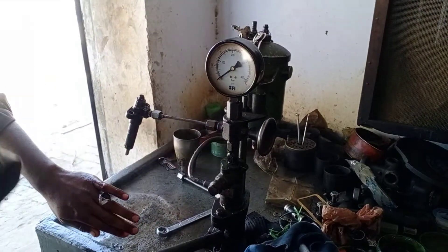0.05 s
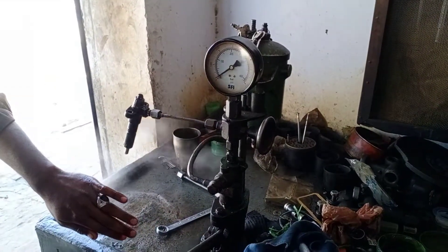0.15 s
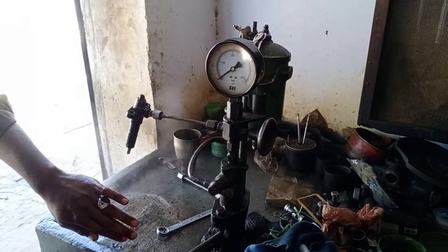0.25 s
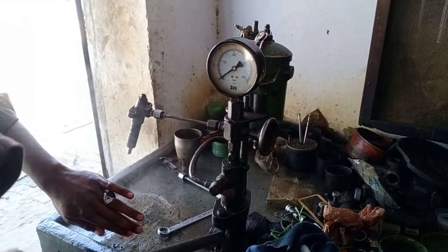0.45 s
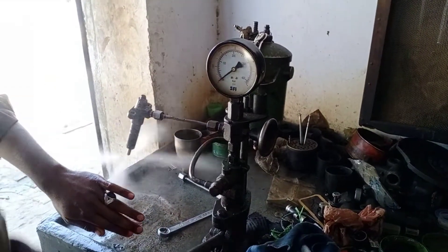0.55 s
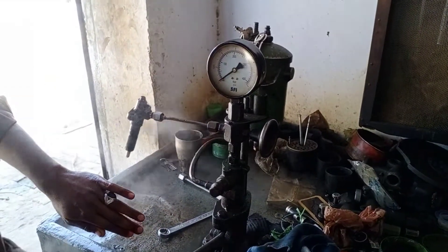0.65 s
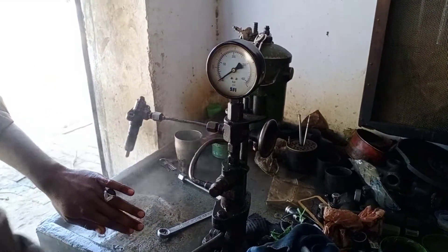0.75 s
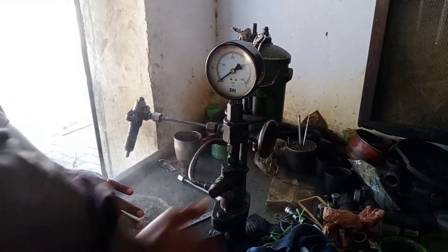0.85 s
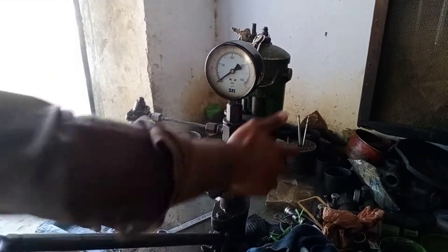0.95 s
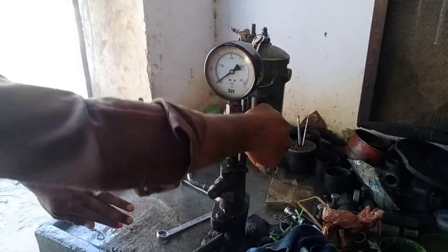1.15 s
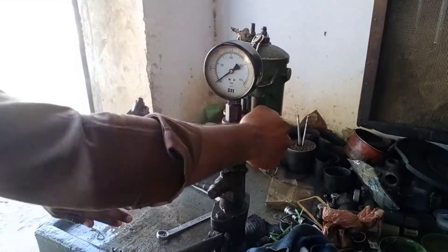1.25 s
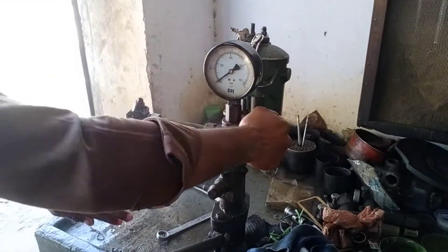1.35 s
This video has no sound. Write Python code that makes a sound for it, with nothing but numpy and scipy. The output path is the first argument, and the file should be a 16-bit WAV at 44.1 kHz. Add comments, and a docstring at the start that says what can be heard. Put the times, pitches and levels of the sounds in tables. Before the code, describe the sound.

A hand-pumped injector tester sprays twice, each short popping burst followed by a lever clack and a soft bench thud. Loose metal then knocks, clinks and clicks sharply, close to the microphone in a small, quiet workshop.

```python
"""A small workshop, one microphone at the front of the bench. A hand-pumped injector tester is worked twice.
On each stroke the nozzle needle chatters, a quick run of pops that rings the steel pipe; then the
lever clacks on its stop and the bench thuds. The hand moves on: loose metal knocks, clinks and
snaps, and a low ring hangs over the quiet room."""
import sys
import numpy as np
from scipy import signal
from scipy.fft import rfft, irfft, next_fast_len
from scipy.io import wavfile
from scipy.ndimage import uniform_filter1d, minimum_filter1d

SR = 44100
rng = np.random.default_rng(int(sys.argv[2]) if len(sys.argv) > 2 else 0)


def unload_audio(sound):
    """Save the sound as a 16-bit wav file, at the path given as the first command line argument."""
    columns = np.transpose(np.atleast_2d(sound))
    # keep every value between -1 and 1, then stretch to whole-number steps
    steps = np.round(np.clip(columns, -1, 1) * 32767)
    wavfile.write(sys.argv[1], SR, steps.astype(np.int16))


N = 61739

# spectra of the fuel pops and of their hiss: f/Hz, level/dB
POP_COLOUR = [(100, -43.5), (240, -31.5), (350, -8), (500, -7), (650, -18), (800, -16), (1000, -5),
              (1200, -8.5), (1500, 1), (1780, 1), (2000, -11), (2600, -23), (3400, -22.5), (5000, -32),
              (9000, -58), (16000, -58)]
HISS_COLOUR = [(300, -21), (2500, -11.5), (3200, 0), (3600, 7), (4100, -7), (5500, -12), (6500, -26),
               (7300, -20), (8300, -45.5), (10500, -47.5), (12500, -26.5), (16000, -35.5)]
# modes of the pipe and nozzle holder, and of the needle leaving its seat: f/Hz, level/dB, t60/s
PIPE_MODES = [(354.6, -8.5, 0.24), (498, -16, 0.37), (876.4, -16.5, 0.3), (1011, -19, 0.2),
              (1078, -12, 0.2), (1326, -12, .25), (1490, -5.5, .52), (1637, -16, 0.72), (1702, -7.5, 0.35),
              (1760, -19, 0.73), (3162, -14.5, 0.069), (3506, -15, .11)]
CRACK_MODES = [(886, -4.5, 0.095), (1007.3, -1, 0.085)]
def spray(start, swell_s, length_s, db, pops_per_s, crack_db, hiss_rise_s):
    """The needle chatters unevenly: each pop is a puff of fuel, the hiss builds, the pipe rings up."""
    pop_rise_s, pop_decay_s, jitter_s, scatter_db = 0.00095, 0.0021, 0.00076, 1
    sag_db_per_s, hiss_sag_db_per_s = 48.5, 67  # the hiss thins as the pressure falls
    puffs, t = np.zeros(N), since(start)
    for k, (late, size) in enumerate(rng.standard_normal((16, 2))):
        age = since(start + k / pops_per_s + jitter_s * late * (k > 0))
        gain = amp(scatter_db * size) * np.clip(length_s * pops_per_s - k, 0, 1)
        puffs += gain * np.exp(-age / pop_decay_s) * (1 - np.exp(-age / pop_rise_s))
    flow = puffs * ramp(start, swell_s) * amp(-sag_db_per_s * t)
    flow /= np.sqrt(np.sum(flow ** 2) / (length_s * SR))
    pops = coloured(flow * noise(), POP_COLOUR)
    hiss_flow = flow * ramp(start, hiss_rise_s) ** 2 * amp(-hiss_sag_db_per_s * t)
    hiss = coloured(hiss_flow * noise(), HISS_COLOUR)
    ring_out = since(start + 0.7 * length_s)
    pipe = sum(amp(mode_db) * fade(ring_out, t60) * wavering(hz, width_hz=30, depth=0.26)
               for hz, mode_db, t60 in PIPE_MODES)
    pipe *= ramp(start, swell_s + 0.015)
    crack = amp(crack_db) * ring(CRACK_MODES, start, rise_s=0.0036)
    return crack + amp(db) * (pops + amp(-5) * hiss + amp(-4) * pipe)


# pump strokes: t/s, swell/s, length/s, level/dB, pop rate/Hz, crack level/dB, hiss rise/s
SPRAYS = [(0.2017, 0.002, 0.0506, -21, 265, -18, 0.019), (0.6388, 0.0069, 0.049, -20.5, 215, -27.5, 0.0096)]
def nozzle():
    """Both sprays reach the microphone with the workshop sounding behind them."""
    return sum(in_room(spray(*stroke), wet_db=-7.5) for stroke in SPRAYS)


# sizzles at the nozzle: t/s, level/dB, hold/s
SPITS = [(0.296, -52, 0.032), (0.718, -46, 0.048)]
# their spectrum: f/Hz, level/dB
SPIT_COLOUR = [(7000, -31.5), (9500, -0.5), (10500, -27), (12300, -3.5), (15500, 3.5)]
def spit():
    """A fine, clumpy sizzle follows each spray as the last fuel leaves the nozzle."""
    flow = sum(amp(db) * ramp(s, 0.01) * fade(since(s + hold), t60=0.13) for s, db, hold in SPITS)
    clumps = unit(noise() * amp(2.5 * drift(rate_hz=370)))
    return coloured(flow * clumps, SPIT_COLOUR)


# blows of the lever on its stop: t/s, level/dB, t60/s
CLACKS = [(.289, -31, 0.13), (0.2953, -21, 0.066), (.307, -33, 0.2), (0.321, -35.5, 0.17),
          (0.725, -22.5, 0.062), (.735, -16.5, 0.047), (.749, -30, 0.18), (0.766, -29, 0.12)]
# spectrum of the contact: f/Hz, level/dB
CLACK_COLOUR = [(230, -17.5), (340, 3.5), (480, -1), (660, -11), (830, 0.5), (1000, -3.5), (2200, -3),
                (3300, -9.5), (4500, -3.5), (5100, -11.5), (7500, -25.5), (8500, -34.5), (10500, -54),
                (12500, -39.5), (16000, -32)]
# modes of the lever: f/Hz, level/dB, t60/s
LEVER_MODES = [(343.9, -6, 0.13), (398, -12, 0.21), (501.2, -17, 0.21), (3630, -29.5, 0.42),
               (4594, -10.5, 0.13), (7294, -21.5, 0.087)]
def lever():
    """With the pressure gone the lever hits its stop and rattles; hard blows ring it far more."""
    hard_db, ring_growth = -18.5, 1.43
    contacts = sum(amp(db) * rattle(s, t60, rise_s=0.0013) for s, db, t60 in CLACKS)
    ringing = sum(amp(hard_db + ring_growth * (db - hard_db)) * ring(LEVER_MODES, s, rise_s=0.0011)
                  for s, db, _ in CLACKS)
    return in_room(coloured(contacts, CLACK_COLOUR) + ringing, wet_db=-12)


# thuds of the bench: t/s, level/dB, rise/s
THUDS = [(.266, -38, .022), (0.391, -49.5, 0.015), (0.699, -36.5, 0.037), (.79, -49.5, 0.0164)]
# their spectrum: f/Hz, level/dB
THUD_COLOUR = [(25, -40.5), (50, -11.5), (82, 3.5), (105, 1), (150, -1), (190, -5.5), (260, -39.5),
               (600, -66)]
# modes of the bench: f/Hz, level/dB, t60/s
BENCH_MODES = [(82.7, -3, 0.67), (150, -11, 0.46)]
def bench():
    """Close to the microphone, each stroke shakes the bench, which rocks back once."""
    hold_s = 0.056
    shake = sum(amp(db) * ramp(s, rise) * fade(since(s + hold_s), t60=0.18) for s, db, rise in THUDS)
    rumble = shake * unit(coloured(noise(), THUD_COLOUR))
    return rumble + sum(amp(db) * ring(BENCH_MODES, s, rise) for s, db, rise in THUDS)


# knocks of loose metal: t/s, level/dB, t60/s
KNOCKS = [(.981, -32, 0.11), (.986, -32.5, 0.19), (1.017, -23.5, 0.056), (1.024, -35, 0.086),
          (1.032, -30.5, 0.11), (1.048, -39, 0.12)]
# spectrum of metal touching metal: f/Hz, level/dB
CONTACT_COLOUR = [(100, -17), (330, -10.5), (550, -20), (1000, 0.5), (1500, 2), (2200, 0), (3000, -6.5),
                  (4100, -4), (5000, -17.5), (7300, -34), (10000, -63), (16000, -57.5)]
# modes of the knocked part: f/Hz, level/dB, t60/s
KNOCK_MODES = [(1500, -8, 0.15), (4100, -7, .053)]
def knocks():
    """A faint tick between the strokes; later, loose metal scrapes and knocks."""
    contacts = coloured(sum(amp(db) * rattle(s, t60) for s, db, t60 in KNOCKS), CONTACT_COLOUR)
    ringing = sum(amp(db) * ring(KNOCK_MODES, s) for s, db, _ in KNOCKS)
    tick = ring([(4090, -48, 0.074), (4300, -45, 0.05)], start=0.576)
    return in_room(contacts + ringing + tick, wet_db=-18.5)


# modes of a small loose part: f/Hz, level/dB, t60/s
CLINK_MODES = [(2240, -50.5, 0.16), (3388, -30.5, 0.15), (4150, -30, 0.051), (4910, -35.5, 0.22),
               (6700, -41, 0.06)]
def clink():
    """A small metal part is struck and damped at once."""
    start, free_s = 1.1678, 0.022
    ringing = rough_ring(CLINK_MODES, start, depth=0.3, rate_hz=350, rise_s=0.00083)
    damping = fade(since(start + free_s), t60=0.023)
    contact = amp(-42.5) * coloured(rattle(start, t60=0.039), CONTACT_COLOUR)
    return in_room(ringing * damping + contact, wet_db=-12.5)


# modes of the snapping steel: f/Hz, level/dB, t60/s
SNAP_MODES = [(842, -33.5, 0.17), (1923, -45, 0.27), (2910, -40.5, 0.35), (3130, -38, 0.24),
              (3768, -41.5, .33), (4387, -43, 0.18), (5000, -48, 0.31), (6940, -50.5, 0.17)]
# spectrum of its contact: f/Hz, level/dB
SNAP_COLOUR = [(500, -36), (2500, -13.5), (3100, 0), (3500, -2), (4350, -2), (4700, -8.5),
               (7000, -30.5), (9000, -63)]
def snap():
    """One sharp steel click that bounces once and leaves a short, rough ring."""
    start, bounce_s, width_s, click_hz = 1.2036, 0.0035, 0.00094, 4164
    t = since(0) - start
    first, bounce = [np.exp(-(age / width_s) ** 2) * np.sin(2 * np.pi * click_hz * age)
                     for age in (t, t - bounce_s)]
    click = amp(-11) * (first + amp(-16.5) * bounce)
    contact = amp(-22) * coloured(rattle(start - 0.002, t60=0.042), SNAP_COLOUR)
    strike = in_room(click + contact, wet_db=-13)
    return strike + rough_ring(SNAP_MODES, start, depth=0.6, rate_hz=110, rise_s=0.0006)


# a faint resonance that sinks in pitch: t/s, level/dB, f/Hz
UPPER_RING = [(.38, -82, 970), (.46, -47, 986), (0.621, -49, 949.5), (0.901, -52.5, 878.4),
              (1.179, -71, 855), (1.239, -45, 823), (1.4, -52.5, 797)]
# swells of the low ring: t/s, level/dB
LOW_RING = [(0, -66.5), (.7, -80), (.82, -45), (.92, -55), (1.0, -51), (1.13, -48.5), (1.17, -69),
            (1.225, -40), (1.27, -47), (1.32, -43), (1.4, -54)]
def lingering_rings():
    """Two rough tones hang over the room, the upper sinking, the lower swelling late."""
    times, db, hz = np.transpose(UPPER_RING)
    sinking_hz = np.interp(since(0), times, hz)
    upper = amp(np.interp(since(0), times, db)) * wavering(sinking_hz, width_hz=150, depth=3.1)
    low = level(LOW_RING) * wavering(313.5, width_hz=77, depth=1.67)
    return upper + low


# swells of the middle band: t/s, level/dB
MID_SWELLS = [(0, -45.5), (.06, -50), (.11, -70), (.19, -57), (.44, -49.5), (.6, -50.5), (.85, -43),
              (.95, -45), (1.15, -52), (1.28, -55), (1.4, -52.5)]
# spectra of that band and of the quiet workshop: f/Hz, level/dB
MID_COLOUR = [(400, -29), (800, -6.5), (980, -11), (1120, -5), (1350, 0), (1490, 3), (1600, -8.5),
              (1780, -1.5), (2100, -18.5), (4500, -19), (6000, -32), (9000, -69.5)]
FLOOR_COLOUR = [(20, -26.5), (45, -20), (80, -8), (160, -1.5), (230, -9.5), (320, -7), (550, -17),
                (900, -10.5), (2300, -24), (4500, -25.5), (6000, -36.5), (8000, -58), (10500, -62),
                (13000, -54.5), (16000, -55)]
# faint steady rings of steel: f/Hz, level/dB
STEEL_TONES = [(2778, -70.5), (4650, -69.5), (5367, -77.5)]
# steel still ringing at the start: f/Hz, level/dB, t60/s
FADING_MODES = [(1490, -37.5, 0.35), (1710, -49.5, 0.4), (2800, -59, 0.27), (4620, -57.5, 0.42)]
def room_tone():
    """Behind the bench work: a swelling middle band, a soft noise floor and faintly ringing steel."""
    mids = level(MID_SWELLS) * unit(coloured(noise(), MID_COLOUR))
    steel = sum(amp(db) * wavering(hz, width_hz=40, depth=1.8) for hz, db in STEEL_TONES)
    floor = amp(-54.5) * unit(coloured(noise(), FLOOR_COLOUR))
    return mids + steel + floor + ring(FADING_MODES, 0, rise_s=0.0022)


# decay of the workshop: f/Hz, t60/s
ROOM_DECAY = [(100, 0.48), (400, 0.29), (1500, 0.58), (4200, 0.49), (7000, 0.23), (13000, 0.13)]
# strength of the wall reflections: f/Hz, level/dB
WALL_COLOUR = [(300, 1.5), (1500, -0.5), (2500, 0), (4000, -0.5), (7000, 5), (13000, 4.5)]
def in_room(direct, wet_db):
    """What reaches the microphone: the direct sound, then the nearby walls and ringing tools."""
    delay_samples = 130
    hz, t, spectrum = signal.stft(rng.standard_normal(SR), SR, nperseg=256)
    t60 = along(ROOM_DECAY, hz)[:, None]
    strength = amp(along(WALL_COLOUR, hz))[:, None]
    tail = signal.istft(spectrum * strength * fade(t, t60) / np.sqrt(t60), SR, nperseg=256)[1]
    tail = np.pad(tail, (delay_samples, 0)) * np.sqrt(2 * np.log(1000) / SR)
    walls = signal.fftconvolve(direct, tail)[:N]
    tools = amp(-11) * signal.fftconvolve(direct, tool_response())[:N]
    return direct + amp(wet_db) * (walls + tools)


def tool_response(count=34, low_hz=1905, high_hz=5390):
    """Tools on the bench ring in sympathy: many thin steel modes that die together, unit energy."""
    t = np.arange(SR // 2) / SR
    place, size, phase = rng.random((3, count, 1))
    hz = low_hz + (high_hz - low_hz) * (np.arange(count)[:, None] + place) / count
    modes = np.sum((0.5 + size) * np.sin(2 * np.pi * (hz * t + phase)), axis=0)
    response = modes * fade(t, t60=0.5) * np.minimum(t / 0.0055, 1)
    return response / np.linalg.norm(response)


def ring(modes, start, rise_s=0.00055):
    """Decaying modes set off by one blow."""
    t = since(start)
    tones = sum(amp(db) * fade(t, t60) * np.sin(2 * np.pi * (hz * t + rng.random()))
                for hz, db, t60 in modes)
    return (1 - np.exp(-t / rise_s)) * tones


def rough_ring(modes, start, depth, rate_hz, rise_s):
    """Modes of a loose part, each shaken on its own as it rings."""
    shaken = sum(ring([mode], start, rise_s) * (1 + depth * drift(rate_hz)) for mode in modes)
    return shaken / np.sqrt(1 + depth ** 2)


def rattle(start, t60, rise_s=0.00058):
    """The dense, quickly dying vibration of one contact."""
    t = since(start)
    return noise() * fade(t, t60) * (1 - np.exp(-t / rise_s))


def wavering(hz, width_hz, depth):
    """A ringing tone of rms 1 that wavers in level and phase."""
    phase = 2 * np.pi * (np.cumsum(hz * np.ones(N)) / SR + rng.random())
    return unit((1 + depth * drift(width_hz)) * np.cos(phase) + depth * drift(width_hz) * np.sin(phase))


def coloured(x, colour):
    """x through a causal filter of unit energy with these (f/Hz, level/dB) points."""
    size = 2 * next_fast_len(N)
    gain = unit(amp(along(colour, np.fft.rfftfreq(size, 1 / SR))))
    cepstrum = irfft(np.log(gain))
    fold = np.r_[1, np.full(size // 2 - 1, 2), 1, np.zeros(size // 2 - 1)]  # to minimum phase
    return irfft(rfft(x, size) * np.exp(rfft(cepstrum * fold)))[:N]


def noise():
    """White noise of rms 1."""
    return rng.standard_normal(N)


def drift(rate_hz):
    """A random curve with rate_hz knots a second."""
    return np.interp(since(0) * rate_hz, np.arange(600), rng.standard_normal(600))


def amp(db):
    """Decibels to gain."""
    return 10 ** (np.asarray(db) / 20)


def unit(x):
    """x at rms 1."""
    return x / np.sqrt(np.mean(x ** 2) + 1e-20)


def along(points, hz):
    """(f/Hz, value) points read on a log axis."""
    freqs, values = np.transpose(points)
    return np.interp(np.log(hz + 1), np.log(freqs + 1), values)


def since(start):
    """Seconds since start, zero before it."""
    return np.maximum(np.arange(N) / SR - start, 0)


def ramp(start, rise_s):
    """A straight rise from 0 to 1, then held."""
    return np.minimum(since(start) / rise_s, 1)


def fade(t, t60):
    """Decay by 60 dB in t60."""
    return np.exp(-np.log(1000) * t / t60)


def level(points):
    """(t/s, level/dB) points as one gain per sample."""
    return amp(np.interp(since(0), *np.transpose(points)))


def scene():
    """Everything in mono, from the front of the bench."""
    tester = nozzle() + spit() + lever() + bench()
    loose_metal = knocks() + clink() + snap()
    return (tester + loose_metal + lingering_rings() + room_tone())[None]


def record(dry):
    """After the microphone a fast limiter holds the peaks, and the top of the treble is cut off."""
    ceiling, window_samples, top_hz = 0.34, 133, 16050
    needed_gain = np.minimum(1, ceiling / (np.abs(dry) + 1e-9))
    gain = uniform_filter1d(minimum_filter1d(needed_gain, window_samples), window_samples)
    size = next_fast_len(N + SR // 2)
    passband = np.fft.rfftfreq(size, 1 / SR) < top_hz
    return irfft(rfft(dry * gain, size) * passband, size)[..., :N]


dry = scene()
out = record(dry)
unload_audio(out)
```